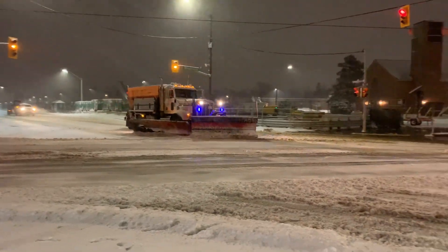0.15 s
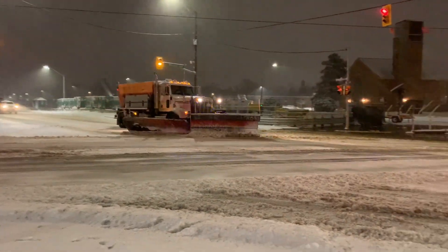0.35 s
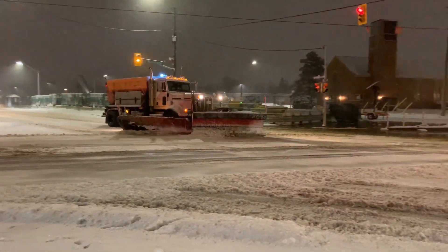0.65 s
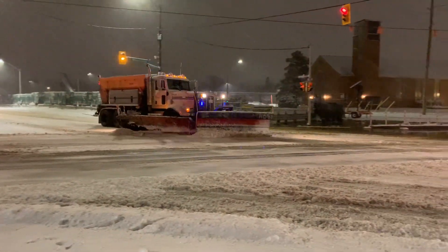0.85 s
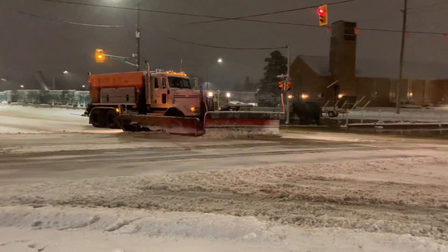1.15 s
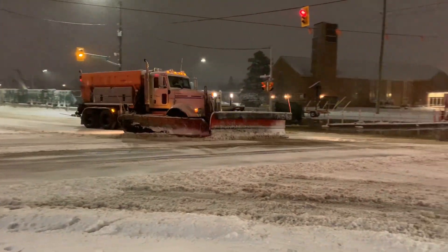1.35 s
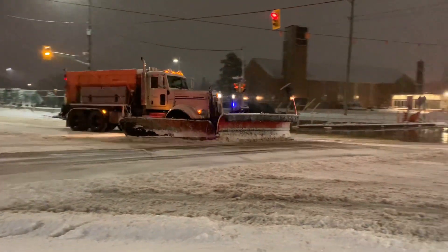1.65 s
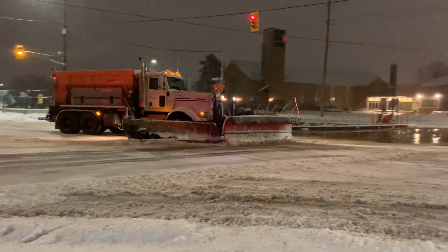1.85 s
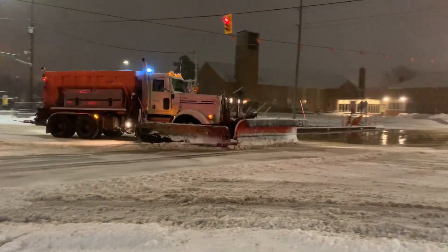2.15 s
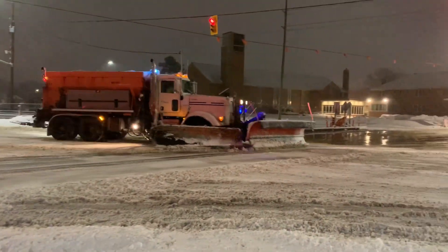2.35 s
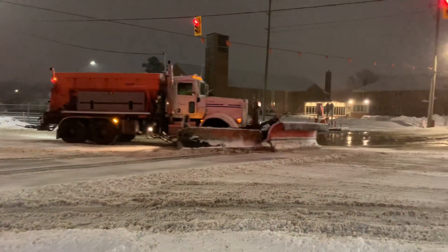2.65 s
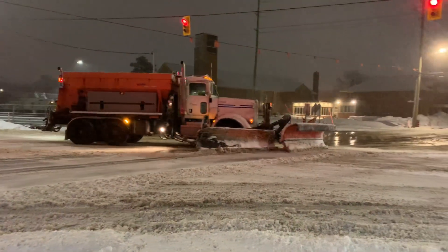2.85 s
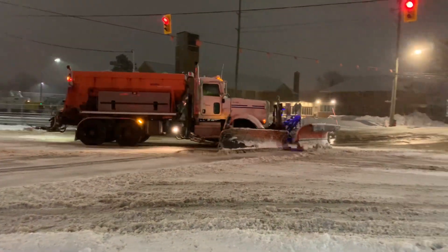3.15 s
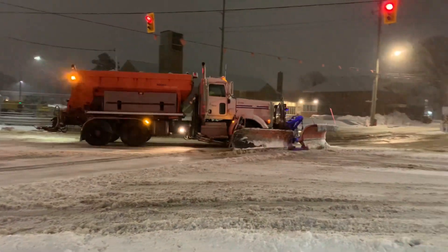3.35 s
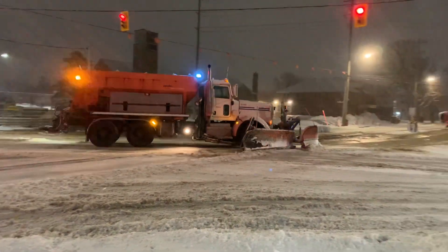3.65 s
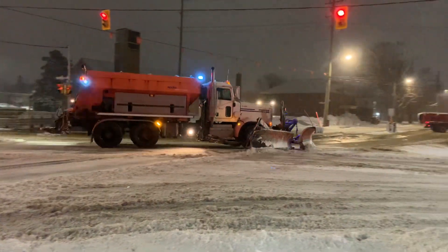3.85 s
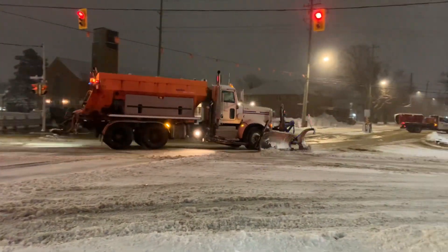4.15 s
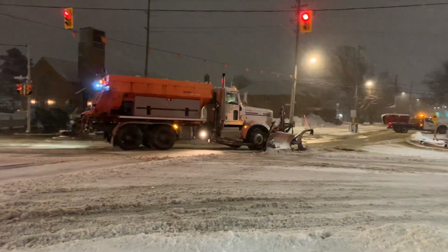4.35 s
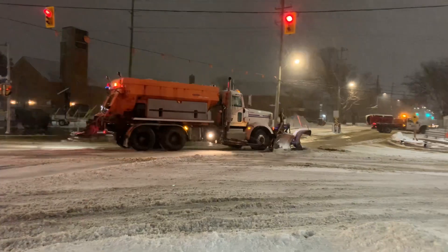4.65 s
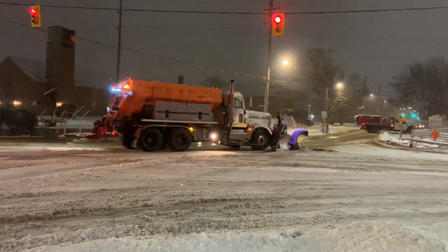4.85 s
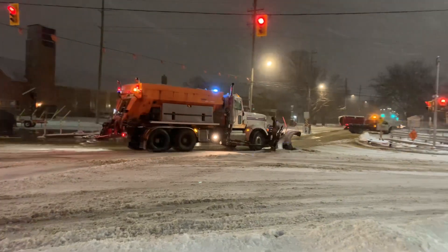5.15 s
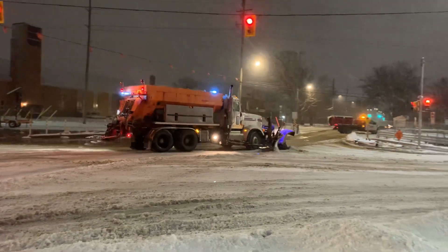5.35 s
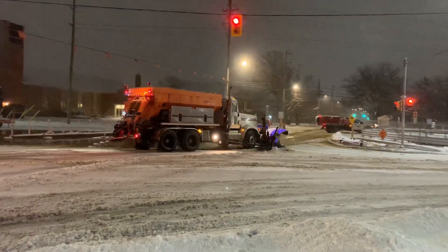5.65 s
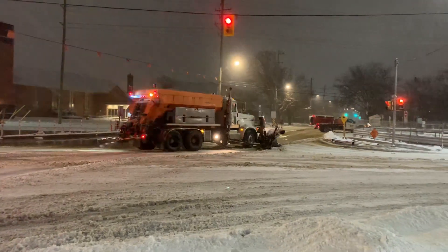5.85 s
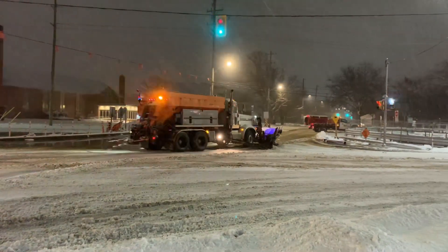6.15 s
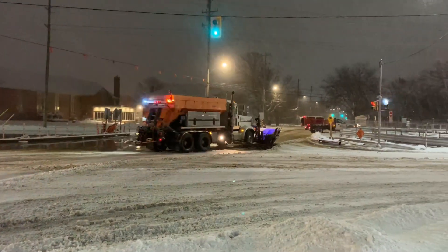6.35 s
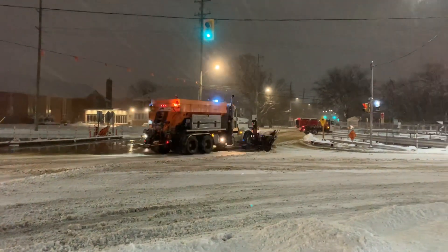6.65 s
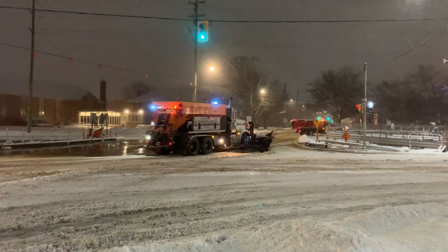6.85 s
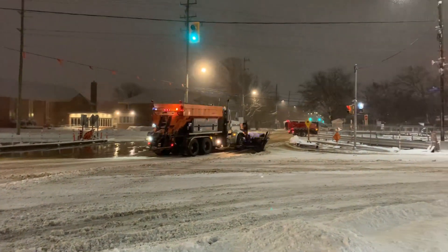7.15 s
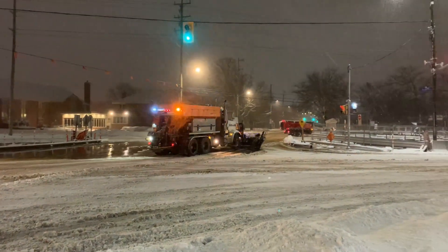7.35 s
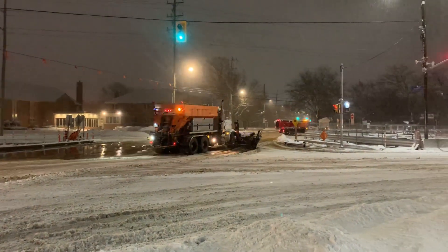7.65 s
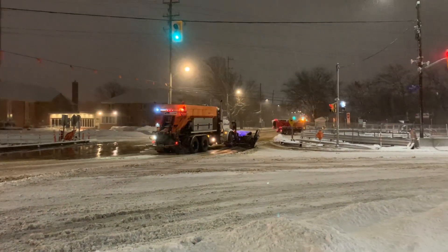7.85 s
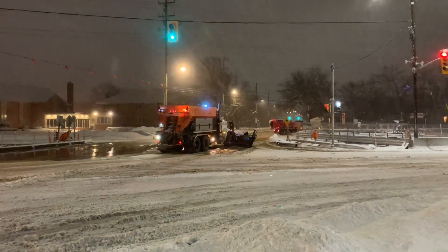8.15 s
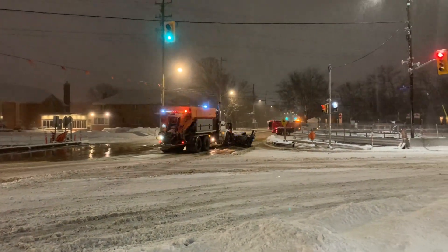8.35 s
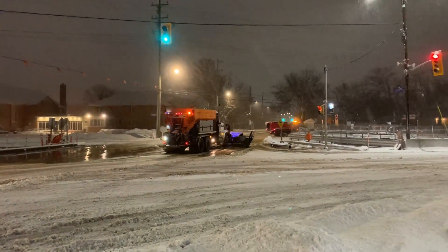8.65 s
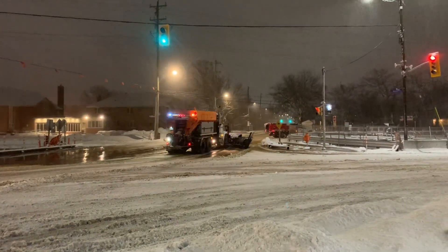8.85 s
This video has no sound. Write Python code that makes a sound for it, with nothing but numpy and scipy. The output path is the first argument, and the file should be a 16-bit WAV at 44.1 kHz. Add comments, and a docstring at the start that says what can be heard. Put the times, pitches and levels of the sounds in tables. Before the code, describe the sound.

A heavy diesel truck turns while its blade sticks and slips over rough pavement, a continuous low rumble with rasping scrapes, groans and metallic bangs. Snow crumbles and sprays lightly. Midway come small chain clinks and a sharp valve click with a short airy hiss. The scraping softens, then the engine swells in pitch and load. Close roadside stereo microphone, slightly saturated peaks, short outdoor echo.

```python
"""A diesel snowplow truck turns through a snowy crossing and pulls away, heard from the kerb.
Its steel blade sticks and slips over the pavement: it judders, drums, scrapes, groans and bangs in ruts.
Snow crumbles and sprays in showers of tiny fractures; chain links ring, road grit and the air valve snap
in short noise bursts, and the brakes hiss. The engine puffs gas and clatters at its firing rate, then
revs up and drones through stack resonances. Snow banks and house fronts scatter it all to the sides."""
import sys
import numpy as np
from scipy import signal
from scipy.fft import rfft, irfft, next_fast_len
from scipy.io import wavfile
from scipy.ndimage import uniform_filter1d

SR = 44100
rng = np.random.default_rng(int(sys.argv[2]) if len(sys.argv) > 2 else 0)


def store_pcm(level_fs):
    """Save levels as 16-bit WAV."""
    pcm = np.round(np.clip(level_fs, -1, 1) * 32767).astype(np.int16)
    wavfile.write(sys.argv[1], SR, np.atleast_2d(pcm).T)


N = 396459
T = np.arange(N) / SR
SIZE = next_fast_len(N + SR)
FREQ = np.maximum(np.fft.rfftfreq(SIZE, 1 / SR), 1)

# steady drag of the blade: [t/s, frame rumble level/dB, drumming level/dB, scrape level/dB]
BLADE_DRAG = [(0, -21, -19, -20.5), (.75, -18, -17, -25.5), (1.35, -18, -22, -23.5), (1.8, -19.5, -23, -25),
              (2.15, -23, -24, -22.5), (2.5, -16.5, -18.5, -26.5), (3.1, -17, -21.5, -27.5),
              (3.55, -17.5, -18.5, -28.5), (4, -22, -31, -35), (4.4, -17.5, -32.5, -31.5),
              (4.85, -21.5, -45, -29), (5.55, -23, -41, -26.5), (6.1, -23.5, -37, -27.5),
              (6.7, -22, -38, -31), (7.25, -23, -30, -30.5), (7.9, -21, -30.5, -23.5),
              (8.99, -20, -26, -26)]
# edge digs into the pavement: [start t/s, length t/s, drumming level/dB, scrape level/dB, grit level/dB]
BLADE_BITES = [(.01, 0.065, -19, -24, -34), (0.167, 0.16, -16.5, -20, -31), (0.473, 0.06, -18, -25.5, -41),
               (0.554, 0.1, -24, -23.5, -33), (0.72, 0.095, -21, -23.5, -40),
               (1.011, 0.15, -19.5, -25, -34.5), (1.18, 0.075, -16, -28, -37),
               (1.798, .09, -30, -29.5, -35), (2.166, 0.055, -20.5, -27, -34), (2.43, .035, -29, -33, -38),
               (2.657, 0.058, -16, -29, -37.5), (2.939, 0.066, -13.5, -25.5, -32),
               (3.063, 0.039, -34, -28.5, -37), (3.19, 0.067, -24, -25, -43), (4.76, 0.03, -22, -28, -46),
               (4.966, 0.073, -32, -25, -33), (5.225, 0.054, -33, -35, -42), (5.29, 0.057, -28, -29, -37),
               (5.81, 0.062, -26, -30, -32.5), (6.258, .05, -26, -35, -35), (6.784, 0.14, -31, -42, -58)]
# blade rides up and loses its load: [start t/s, length t/s, level/dB added to the drag]
BLADE_LIFTS = [(0.336, 0.11, -8), (0.878, 0.17, -2.5), (1.28, 0.074, -1)]
BITE_ATTACK_S, BITE_RELEASE_S = 0.0075, 0.034
# plough frame bounces on a bump: [middle t/s, level/dB]
FRAME_BOUNCES = [(.24, -16), (.85, -11.5), (1.09, -15), (1.42, -15.5), (1.98, -14), (2.36, -17),
                 (2.78, -16), (4.15, -13.5), (4.3, -15.5), (5.025, -8.5), (6.38, -12), (6.63, -17),
                 (6.87, -17), (8.73, -18.5)]
BOUNCE_HALF_S = 0.041
# modes of the steel blade: [f/Hz, width f/Hz, level/dB against the scrape]
BLADE_MODES = [(347.5, 80, -18), (449.5, 80, -15.5), (542.7, 90, -15.5), (689.5, 110, -20.5),
               (1084, 200, -22), (1290, 200, -23), (1924, 250, -32.5)]
# blade groans: [middle t/s, half length t/s, f/Hz, width f/Hz, level/dB]
BLADE_GROANS = [(0.023, 0.02, 320.4, 108, -11.5), (0.235, 0.017, 402, 85, -11.5),
                (0.216, 0.021, 950, 120, -23), (0.72, 0.16, 400, 152, -25), (1.151, 0.043, 1147, 200, -29),
                (1.198, 0.015, 309, 81, -16), (2.595, 0.2, 115.2, 9.2, -23.5),
                (2.666, 0.064, 1350, 220, -33.5), (2.99, 0.059, 201, 27, -20),
                (2.991, 0.067, 640, 130, -27.5), (3.352, 0.56, 114.1, 9, -20.5),
                (3.8, 0.25, 1835, 190, -42), (4.147, 0.25, 719, 90, -39.5), (4.785, 0.11, 692, 124, -32.5),
                (5.297, 0.05, 550, 180, -23.5), (5.337, 0.011, 340, 69, -17), (5.898, 0.094, 350, 130, -22),
                (7.217, 0.05, 402, 50.3, -26.5)]
# blade strikes ruts: [t/s, thud level/dB, clank level/dB, crack level/dB], the last two before blows() trims them
RUT_KNOCKS = [(0.017, -24, -15, -15), (0.058, -19.5, -9, -26), (0.106, -14, -17.5, -30),
              (.148, -28, -15, -26), (.174, -16, -9.5, -21), (.199, -15, -20, -29), (.224, -7, -9.5, -27),
              (0.239, -19, -12, -25), (.265, -20, -8, -19), (.289, -25, -15, -20), (.314, -21, -13, -14),
              (0.336, -11, -16, -28), (.511, -19, -15, -27), (0.574, -18, -21, -32), (0.612, -15, -14, -30),
              (0.623, -25, -17, -16), (.645, -30, -26, -25), (.817, -20, -15.5, -39), (.878, -25, -27, -40),
              (1.039, -7, -7.5, -15.5), (1.073, -24, -21, -18.5), (1.14, -26, -22, -22.5),
              (1.192, -20, -10.5, -17), (1.264, -30, -24, -18.5), (1.391, -23, -22.5, -29),
              (1.922, -27, -22, -35), (1.973, -22, -21, -37), (2.313, -30, -27, -28),
              (2.951, -9, -14.5, -15.5), (2.96, -16, -18, -36), (2.977, -15, -19, -35),
              (3.067, -25, -19, -28), (3.192, -26, -23, -32), (3.672, -26, -31, -40),
              (3.801, -36, -30, -29), (3.963, -17, -21, -32), (4.396, -36, -29, -37),
              (4.429, -18, -18.5, -35), (4.718, -36, -24, -25), (4.78, -6.5, -20.5, -40),
              (4.98, -40, -17.5, -30), (5.026, -15, -28, -28), (5.334, -28, -21, -31),
              (5.659, -34, -33, -34), (5.758, -32, -30, -36), (5.832, -26, -28, -22),
              (6.222, -37, -25, -36), (6.785, -12, -22, -44), (6.815, -17, -22.5, -42),
              (6.846, -28, -30, -38), (6.998, -41, -22.5, -37), (7.156, -17, -24, -42),
              (7.925, -24, -17, -51), (8.12, -22, -17, -36), (8.345, -31, -19, -37), (8.653, -26, -24, -25)]
BEND_LAG_S = 0.00478  # how late a bending wave arrives at 300 Hz

# six-cylinder diesel easing off in the turn and revving out of it: [t/s, firing rate f/Hz]
ENGINE_REVS = [(0, 100), (1.5, 100), (2.5, 85), (6.7, 80), (7.1, 99), (7.5, 107), (7.8, 113.7), (7.97, 119),
               (8.3, 131.5), (8.5, 136), (8.68, 138), (8.99, 132)]
# engine under load: [t/s, roar level/dB, clatter level/dB]
ENGINE_LOAD = [(0, -32, -35.5), (.8, -33, -42.5), (1.5, -46, -36), (3, -38, -37), (4.3, -37.5, -37),
               (5.5, -39, -37), (6.7, -34, -41), (7.1, -28, -36), (7.5, -28.5, -32.5), (8, -24, -33),
               (8.45, -23.5, -29.5), (8.99, -23, -31.5)]
# weaker exhaust lines: [multiple of the firing rate, level/dB against the roar]
EXHAUST_ORDERS = [(1, -7), (2, -18), (2.5, -13.5), (3.5, -16), (4, -16), (5, -17)]
# stack resonances swept by a firing harmonic: [multiple of firing rate, centre f/Hz, width f/Hz,
# level/dB against the roar]
STACK_RESONANCES = [(3, 350, 56, 3.5), (3, 409, 31, -2.5), (6, 657, 40, -3.5)]
# one broad muffler resonance blown by the gas: [f/Hz, width f/Hz, level/dB against the roar]
MUFFLER_RESONANCE = (605, 60, -10)

# snow thrown off the edge: [t/s, crunch level/dB, fine spray level/dB]
SNOW_FLOW = [(.15, -44, -48.5), (.4, -52.5, -50), (1.2, -47, -44.5), (1.7, -45, -48.5), (2.05, -43, -44),
             (2.7, -42, -48.5), (4.4, -41, -49), (5, -43.5, -52.5), (5.7, -45, -53), (6.4, -47.5, -50),
             (6.8, -48, -54), (7.4, -43.5, -54.5), (8.35, -40, -45), (8.99, -41.5, -51.5)]
# chain links strike steel: [t/s, tick level/dB, ring level/dB, link pitch f/Hz]
CHAIN_CLINKS = [(3.251, -37, -54, 10300), (3.439, -34, -59, 10300), (3.975, -30, -41, 10400),
                (4.117, -34, -62, 10300), (4.309, -39, -62, 10300), (5.834, -38, -54, 11000),
                (5.856, -46, -49, 9895), (5.91, -48, -51, 10400), (6.274, -25.5, -36, 9940),
                (6.397, -37, -49, 10100), (6.416, -34, -58, 10400), (6.458, -38, -44, 10600),
                (6.514, -33, -51, 9900), (6.555, -40, -56, 10900), (7.027, -27.5, -53, 10400),
                (7.91, -38, -56, 10300), (7.973, -34, -49, 10200)]
# modes of one link: [f/Hz above the link pitch, level/dB against the ring, t60 t/s]
LINK_MODES = [(-260, 4, 0.17), (-1, 2.5, 0.12), (451, 3, .09), (848, -6, .06), (1145.5, 10, 0.031),
              (4200, -11, .04)]
# short snaps, road grit bursting and, at 4.485 s, the air valve's click: [t/s, level/dB before the trim in snaps()]
SHORT_SNAPS = [(3.439, -14.5), (4.485, -17), (5.369, -16), (5.423, -17), (6.272, -16)]
# air let out of the brakes: [start t/s, length t/s, starting level/dB]
AIR_VENTS = [(4.489, 0.2, -16), (5.519, 0.11, -33)]
AIR_ATTACK_S, AIR_RELEASE_S, AIR_SAG_DB_PER_S = 0.026, 0.029, 38
# resonances of the air valve: [f/Hz, width f/Hz, level/dB against the jet]
VALVE_WHISTLES = [(1230, 130, -13), (1910, 250, -17), (2660, 420, -19)]

# spectra of the sources, only their shape counts: [f/Hz, level/dB]
RUMBLE_COLOUR = [(18, -33.5), (32, -12), (45, 3), (60, 7), (85, 7), (115, -0.5), (150, -4), (260, -49.5)]
DRUM_COLOUR = [(70, -30), (110, 4), (140, 0.5), (210, 0), (270, -7.5), (360, -14.5), (700, -56)]
SCRAPE_COLOUR = [(150, -23.5), (250, 2), (330, 2.5), (560, -3), (720, -2.5), (900, -12.5), (1080, -12.5),
                 (1330, -9.5), (1560, -24), (1900, -25.5), (2800, -38), (3500, -35.5), (8000, -64)]
GRIND_COLOUR = [(500, -21.5), (800, 0.5), (1100, 6), (1400, 4), (1700, 0.5), (2100, -4), (2900, -9.5),
                (3600, -19), (7000, -42)]
THUD_COLOUR = [(25, -62), (55, 15.5), (85, -8), (200, 2), (320, -24), (900, -49)]
CLANK_COLOUR = [(130, -24), (240, 8), (400, 5), (540, 5), (650, 0), (900, -7.5), (1300, -18), (1900, -43),
                (3000, -57.5)]
CRACK_COLOUR = [(600, -13), (900, -6), (1070, 10), (1180, 7.5), (1300, 6.5), (1600, 2), (1950, -5),
                (2300, -13.5), (2950, -16), (3400, -25), (6000, -53)]
ROAR_COLOUR = [(120, -19.5), (270, 4.5), (360, 5.5), (460, 4.5), (610, 2.5), (720, -4), (900, -12.5),
               (1080, -23), (1240, -11), (1500, -68), (2200, -31.5)]
CLATTER_COLOUR = [(600, 1.5), (1200, 6.5), (1500, 3.5), (1850, 6), (2150, 0.5), (2450, 3), (2700, -2),
                  (2980, 0), (3300, -8.5), (5000, -11), (9000, -32.5)]
CRUNCH_COLOUR = [(1200, 3.5), (2500, -11), (3800, 5.5), (5000, 0), (7000, 0.5), (8500, -4), (10500, -11),
                 (15000, -42)]
SPRAY_COLOUR = [(4000, -27), (7000, -32), (9000, 11.5), (11000, 10), (12800, 11.5), (14500, 13),
                (15300, -16)]
TICK_COLOUR = [(1500, 12.5), (3500, 2), (5000, -9), (7000, 8), (9000, 7), (11000, -2), (14500, 0),
               (15300, -27)]
SNAP_COLOUR = [(1200, -12), (2500, 4), (4500, 6), (6300, -1), (8000, -2), (10000, -14), (15000, -9)]
JET_COLOUR = [(500, -18), (950, 0), (1220, -4), (1500, 0), (2150, -10), (2550, 5.5), (3300, 0), (4000, 6),
              (5700, 0), (7000, 0.5), (9000, 6), (11000, 1), (14500, 6), (15300, -22)]

# street reflections against the direct sound: [f/Hz, level/dB]
ECHO_COLOUR = [(60, 2), (110, -3), (160, 5), (220, 2), (280, 2.5), (350, -7.5), (480, -7.5), (700, -5),
               (1300, -8), (2400, -4.5), (3350, -3), (4500, -10.5), (5500, -7.5), (6700, 1), (8200, -51),
               (15000, -20)]
# stereo image: [t/s, f/Hz below which it is narrow, left minus right level/dB]
STEREO_IMAGE = [(0, 330, 1), (.3, 440, .6), (3.1, 430, -.1), (3.6, 310, -.1), (4, 200, -.2),
                (4.6, 135, -.6), (6.5, 125, -.8), (7.2, 95, -1.2), (7.7, 62, -1.2), (8.99, 55, -1.2)]
# left microphone port against right: [f/Hz, phase lead in turns, level/dB]
MIC_PORTS = [(300, 0, 0), (700, .04, -1), (2000, 0, -1), (2800, -.08, -2), (3400, -.45, -2.5),
             (4600, -.2, -3), (5500, -.3, -3), (6600, 0, -1), (7500, .2, 0), (8300, .47, 0), (8950, .52, 0),
             (10400, .97, 0), (11600, 1.03, 0), (13000, 1.47, 0), (13700, 1.52, 0), (15000, 2, 0)]
TOP_HZ = 15200


def undb(db):
    """Decibels to gain."""
    return 10 ** (np.asarray(db) / 20)


def unit(x):
    """Scale to rms 1."""
    return x / np.sqrt(np.mean(x ** 2))


def curves(rows):
    """The columns of a time table, one value a sample."""
    s, *columns = np.transpose(rows)
    return [np.interp(T, s, c) for c in columns]


def spectra(rows):
    """The columns of a frequency table, one value a bin, interpolated over log frequency."""
    hz, *columns = np.transpose(rows)
    return [np.interp(np.log(FREQ), np.log(hz), c) for c in columns]


def colour(x, points):
    """Causal filter with the given spectrum, falling steeply above its last point; white noise keeps its level."""
    top_fall = np.minimum(points[-1][0] / FREQ, 1) ** 2
    gain = unit(undb(spectra(points)[0]) * top_fall)
    # folding the cepstrum gives minimum phase, so blows stay sharp
    cepstrum = irfft(np.log(gain), SIZE)
    cepstrum[1:SIZE // 2] *= 2
    cepstrum[SIZE // 2 + 1:] = 0
    response = np.exp(rfft(cepstrum))
    return irfft(rfft(x, SIZE) * response, SIZE)[:N]


def walk(rate):
    """Smooth chance with spread 1, turning about rate times a second."""
    k = max(int(SR / rate), 1)
    steps = np.repeat(rng.standard_normal(N // k + 1), k)
    return unit(uniform_filter1d(steps, k)[:N])


def slips(rate, spread_db):
    """Tiny fractures at random moments, about rate a second, of uneven size and random sign."""
    size = undb(spread_db * rng.standard_normal(N))
    sign = np.sign(rng.standard_normal(N))
    return unit(size * sign * (rng.random(N) < rate / SR))


def fade(start, t60):
    """Sample range (half a second at most) and falling envelope of something struck at start."""
    i = max(int(start * SR), 0)
    t = T[:min(SR // 2, N - i)]
    return slice(i, i + len(t)), undb(-60 * t / t60)


def swell(middle, half):
    """Sample range and bell-shaped envelope of something that comes and goes."""
    span = slice(*np.searchsorted(T, [middle - np.pi * half, middle + np.pi * half]))
    return span, np.exp(-((T[span] - middle) / half) ** 2)


def gate(start, length, attack, release, t=T):
    """An envelope that rises, holds and dies away."""
    rise = np.clip((t - start) / attack, 0, 1)
    return rise * np.exp(-np.maximum(t - start - length, 0) / release)


def ringing(hz, width):
    """A mode rubbed at random: a narrow band around hz, which may drift."""
    angle = 2 * np.pi * np.cumsum(hz * np.ones(N)) / SR
    return walk(width) * np.cos(angle) + walk(width) * np.sin(angle)


def steady(x, window_s=0.0536):
    """A judder feeds itself, so its swing stays even from one moment to the next."""
    local_power = uniform_filter1d(x ** 2, int(window_s * SR))
    return x / np.sqrt(local_power + 0.12 * np.mean(x ** 2))


def contact():
    """Gains of frame, sheet, edge and grit: a steady drag, less in a lift, more in a bounce or bite."""
    lift_db = sum(db * gate(s, length, BITE_ATTACK_S, BITE_RELEASE_S) for s, length, db in BLADE_LIFTS)
    drag = undb(curves(BLADE_DRAG) + lift_db)
    power = np.vstack([drag ** 2, np.zeros(N)])  # grit has no steady part
    for s, db in FRAME_BOUNCES:
        span, bell = swell(s, BOUNCE_HALF_S)
        power[0, span] += (undb(db) * bell) ** 2
    for s, length, *levels_db in BLADE_BITES:
        span, _ = fade(s, length)
        bite = gate(s, length, BITE_ATTACK_S, BITE_RELEASE_S, T[span])
        power[1:, span] += np.outer(undb(levels_db), bite) ** 2
    return np.sqrt(power)


def blade(judder_db=0.24, bite_db=0.6, sway_db=1.8, wander_db=2.0, drift=.025,
          body=0.99, body_hz=420, body_from_db=-21.0, chatter_db=-19.5):
    """The edge sticks and slips: big slips shake the frame, smaller ones drum the blade and rasp."""
    rumble, drum, scrape, grit = contact()
    # the uneven road loads and unloads the whole plough
    road = undb(sway_db * walk(22))
    frame = steady(colour(slips(600, 0.61), RUMBLE_COLOUR)) * rumble
    sheet = steady(colour(slips(500, 3.0), DRUM_COLOUR)) * drum
    # the grip grows jerkier as the scrape moves away from its mean level, louder or softer
    scrape_db = 20 * np.log10(scrape)
    jerk_db = judder_db + bite_db * (scrape_db - scrape_db.mean())
    grip = undb(jerk_db * walk(120))
    rasp = steady(colour(grip * slips(1500, 2.83), SCRAPE_COLOUR))
    # a light touch sounds thin, a hard bite wakes the body of the blade
    low_pass = signal.butter(2, body_hz, fs=SR, output="sos")
    low = signal.sosfiltfilt(low_pass, rasp)
    rasp = rasp + low * (undb(body * (scrape_db - body_from_db)) - 1)
    # the point of contact wanders along the edge, so each mode comes and goes and shifts a little
    modes = 0
    for hz, width, db in BLADE_MODES:
        mode = ringing(hz * (1 + drift * walk(3)), width)
        modes = modes + mode * undb(db + wander_db * walk(7))
    # loose pins and hinges chatter against the steel
    chatter = colour(slips(70, 2.2), CRACK_COLOUR) * undb(chatter_db)
    # a bite grinds ice and grit under the steel
    grind = steady(colour(slips(900, 2.8), GRIND_COLOUR))
    return road * (frame + sheet) + (rasp + modes + chatter) * scrape + grind * grit


def engine(throb=0.39, knock=0.04, wobble=0.0048, rough_db=2.0):
    """Each firing puffs gas down the stack and raps the block; the stack drones as revs sweep its resonances."""
    hz, = curves(ENGINE_REVS)
    roar_db, clatter_db = curves(ENGINE_LOAD)
    angle = 2 * np.pi * np.cumsum(hz * (1 + wobble * walk(45))) / SR
    # unequal cylinders make the beat swell once a crank turn, every third firing
    beat = np.cos(angle) + .5 * np.cos(angle / 3)
    gas = colour(unit(1 + throb * beat) * rng.standard_normal(N), ROAR_COLOUR)
    lines = sum(ringing(order * hz, 9) * undb(db) for order, db in EXHAUST_ORDERS)
    muffler_hz, muffler_width_hz, muffler_db = MUFFLER_RESONANCE
    muffler = ringing(muffler_hz, muffler_width_hz) * undb(muffler_db)
    clatter = colour(unit(1 + knock * beat) * slips(7000, 2.54), CLATTER_COLOUR)
    drone = 0
    for order, centre_hz, width_hz, db in STACK_RESONANCES:
        off = 2 * (order * hz - centre_hz) / width_hz  # distance from resonance in half widths
        tone = np.sqrt(2) * undb(db) * np.sin(order * angle)
        drone = drone + tone / (1 + off ** 4) * undb(rough_db * walk(55))
    return (gas + muffler + lines + drone) * undb(roar_db) + clatter * undb(clatter_db)


def snow(flutter_db=1.26):
    """Packed snow crumbles at the edge and under the tyres; fine grains spray off."""
    crunch_db, spray_db = curves(SNOW_FLOW)
    flow = undb(flutter_db * walk(44))
    coarse = colour(slips(9000, 3.5), CRUNCH_COLOUR) * undb(crunch_db)
    fine = colour(slips(16000, 2.7), SPRAY_COLOUR) * undb(spray_db)
    return flow * (coarse + fine)


def groans(count=600):
    """The edge catches and for a moment the slips lock onto one mode of the blade."""
    out = np.zeros(N)
    chance = rng.standard_normal((len(BLADE_GROANS), 2, count))
    for (s, half, hz, width, db), pushes in zip(BLADE_GROANS, chance):
        span, bell = swell(s, half)
        t = T[:len(bell)]
        # random pushes, width of them a second, sway the tone in size and phase
        swing = np.interp(t * width, np.arange(count), pushes[0] + 1j * pushes[1])
        ring = bell * np.real(swing * np.exp(2j * np.pi * hz * t))
        out[span] += undb(db) * unit(ring) * np.sqrt(np.mean(bell ** 2))
    return out


def bend(x):
    """Bending waves run slower at low pitch, so a blow on the blade sweeps briefly downward."""
    slowness = np.maximum(np.sqrt(1500 / np.maximum(FREQ, 150)) - 1, 0)  # no lag above 1500 Hz
    lag = BEND_LAG_S * slowness / (np.sqrt(5) - 1)
    phase = 2 * np.pi * np.cumsum(lag) * SR / SIZE
    return irfft(rfft(x, SIZE) * np.exp(-1j * phase), SIZE)[:N]


def blows(column, t60, grain_rate, strike_db, rattle_db):
    """One sharp strike for each knock, then a dying rattle of smaller ones."""
    rattle, strikes = np.zeros((2, N))
    for row in RUT_KNOCKS:
        span, fall = fade(row[0], t60)
        rattle[span] += undb(row[column] + rattle_db) * fall
        strikes[span.start] = undb(row[column] + strike_db)
    return strikes + rattle * slips(grain_rate, 2.6)


def knocks(thud_t60=0.059):
    """Each rut strikes the edge, jolts the frame, clanks the blade in its hinges and cracks against the steel."""
    push = np.zeros(N)
    for s, thud_db, *_ in RUT_KNOCKS:
        span, fall = fade(s, thud_t60)
        push[span] += undb(thud_db) * fall
    thud = colour(push * slips(1500, 1), THUD_COLOUR)
    clank = blows(-2, t60=.075, grain_rate=1800, strike_db=24, rattle_db=-6)
    crack = blows(-1, t60=.08, grain_rate=1200, strike_db=19, rattle_db=-7)
    return thud + bend(colour(clank, CLANK_COLOUR) + colour(crack, CRACK_COLOUR))


def chains(tick_t60=0.065, detune_hz=45, scatter_db=2.5):
    """A short gritty tick and the ring of a steel link; no two links ring alike."""
    ticks, rings = np.zeros((2, N))
    chance = rng.standard_normal((len(CHAIN_CLINKS), len(LINK_MODES), 3))
    for (s, tick_db, ring_db, link_hz), draws in zip(CHAIN_CLINKS, chance):
        span, fall = fade(s, tick_t60)
        ticks[span] += undb(tick_db) * fall
        for (offset_hz, db, t60), (shift, size, phase) in zip(LINK_MODES, draws):
            span, fall = fade(s, t60)
            hz = link_hz + offset_hz + detune_hz * shift
            tone = np.sin(2 * np.pi * (hz * T[span] + phase))
            rings[span] += undb(ring_db + db + scatter_db * size) * fall * tone
    return rings + colour(ticks * slips(4000, 3), TICK_COLOUR)


def snaps(snap_t60=0.01, trim_db=-10):
    """Noise bursts of a few milliseconds: road grit bursting, and at 4.485 s the air valve's click."""
    burst = np.zeros(N)
    for s, db in SHORT_SNAPS:
        span, fall = fade(s, snap_t60)
        burst[span] += undb(db + trim_db) * fall
    return colour(burst * slips(12000, 1), SNAP_COLOUR)


def air_brake(sputter_db=0.2, eddy_db=1.7, waver_db=2.0, drift=.015):
    """A valve opens and a turbulent jet escapes, whistling in the port and sagging as the pressure falls."""
    # eddies make each band of the jet flare on its own
    hiss = rfft(colour(rng.standard_normal(N), JET_COLOUR), SIZE)
    band = np.searchsorted([1500, 2200, 3200, 4500, 6400, 9000], FREQ)
    jet = 0
    for k in range(band.max() + 1):
        jet = jet + irfft(hiss * (band == k), SIZE)[:N] * undb(eddy_db * walk(50))
    jet = unit(jet)
    whistle = 0
    for hz, width, db in VALVE_WHISTLES:
        tone = ringing(hz * (1 + drift * walk(20)), width)
        whistle = whistle + tone * undb(db + waver_db * walk(45))
    out = 0
    for s, length, db in AIR_VENTS:
        pressure = undb(-AIR_SAG_DB_PER_S * np.maximum(T - s, 0))
        valve = undb(db) * gate(s, length, AIR_ATTACK_S, AIR_RELEASE_S)
        # the whistles need pressure and die before the hiss does
        out = out + (jet + whistle * pressure) * pressure * valve
    return out * undb(sputter_db * walk(120))


def reflections(x, t60):
    """One scattered echo pattern off snow banks and house fronts."""
    _, fall = fade(0, t60)
    echo = fall * rng.standard_normal(len(fall))
    return signal.oaconvolve(x, echo / np.linalg.norm(echo))[:N]


def street(x, t60=0.1, count=5):
    """Direct sound in the middle, reflections to the sides; the bass widens as the truck leaves."""
    # the echo paths keep changing as the truck moves, while their total strength holds
    paths = np.array([walk(9) for _ in range(count)])
    shares = paths / np.linalg.norm(paths, axis=0)
    scattered = sum(reflections(x, t60) * share for share in shares)
    scattered = irfft(rfft(scattered, SIZE) * undb(spectra(ECHO_COLOUR)[0]), SIZE)[:N]
    # a steep moving high-pass keeps the low end narrow
    corner_hz, pan_db = curves(STEREO_IMAGE)
    hz, s, frames = signal.stft(scattered, SR, nperseg=2048)
    ratio = np.interp(s, T, corner_hz) / (hz[:, None] + 1)
    high_pass = 1 / np.sqrt(1 + ratio ** 18)
    side = signal.istft(frames * high_pass, SR)[1][:N]
    return np.array([x + side, x - side]) * undb(np.array([pan_db, -pan_db]) / 2)


def scene():
    """The whole truck in the crossing."""
    plough = blade() + groans() + knocks() + snow()
    truck = engine() + chains() + air_brake()
    return street(plough + truck + snaps())


def record(dry):
    """Two microphone ports drift apart in phase toward the treble; peaks are rounded and the top is cut."""
    turns, tilt_db = spectra(MIC_PORTS)
    # each port takes half of the difference
    lead = np.pi * 1j * turns + np.log(undb(tilt_db / 2))
    ports = irfft(rfft(dry, SIZE) * np.exp([lead, -lead]), SIZE)[:, :N]
    rounded = ports / (1 + ports ** 6) ** (1 / 6)
    top_cut = signal.ellip(8, .2, 70, TOP_HZ, fs=SR, output="sos")
    return signal.sosfilt(top_cut, rounded)


dry = scene()
out = record(dry)
store_pcm(out)
```